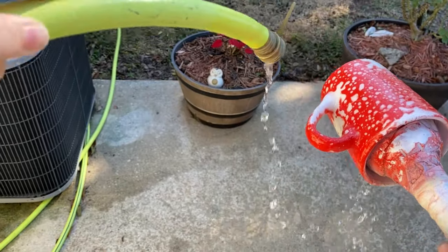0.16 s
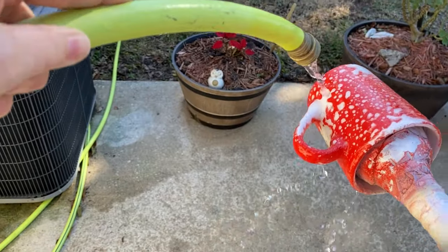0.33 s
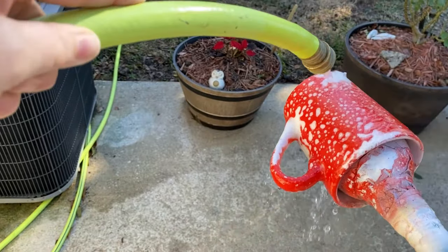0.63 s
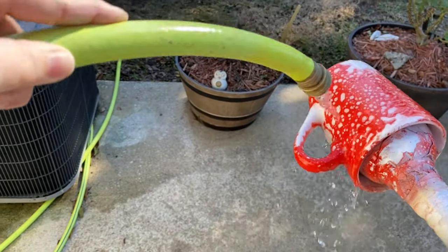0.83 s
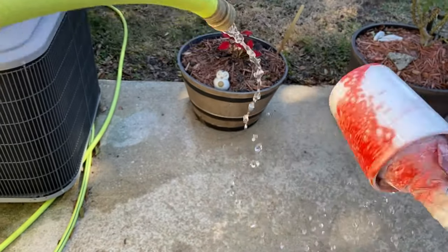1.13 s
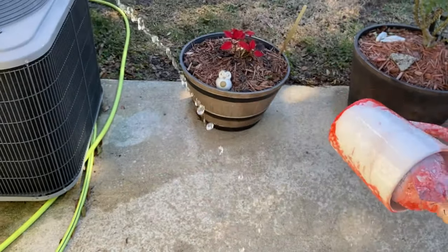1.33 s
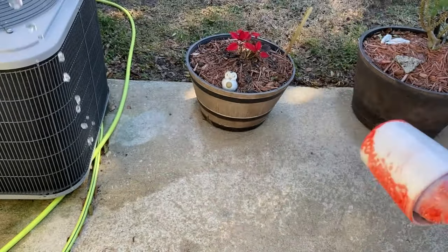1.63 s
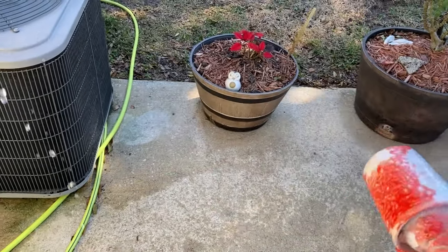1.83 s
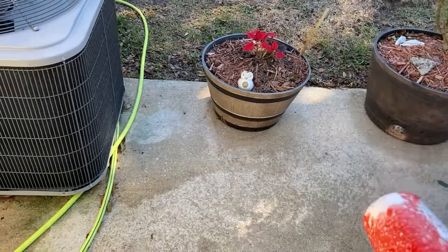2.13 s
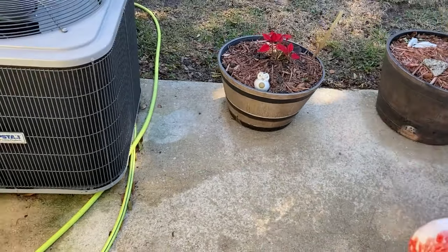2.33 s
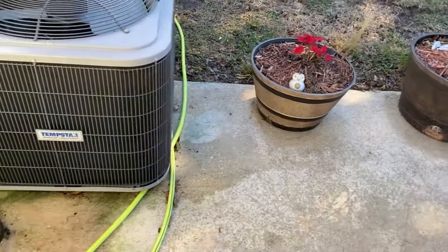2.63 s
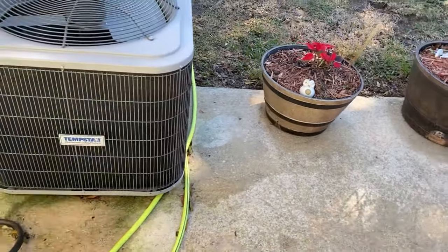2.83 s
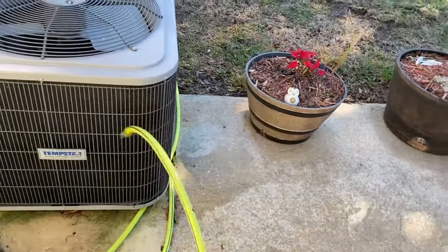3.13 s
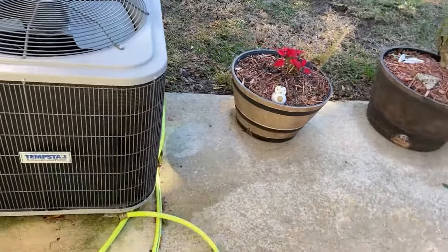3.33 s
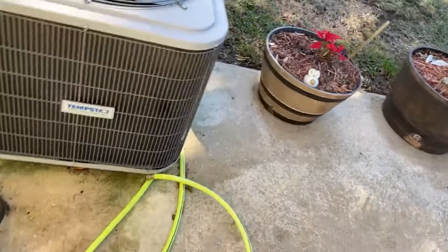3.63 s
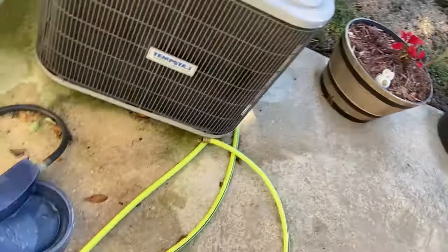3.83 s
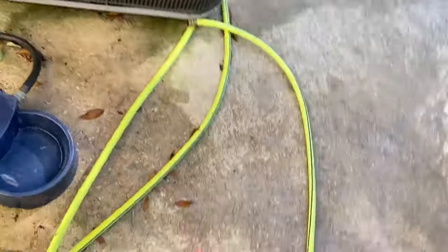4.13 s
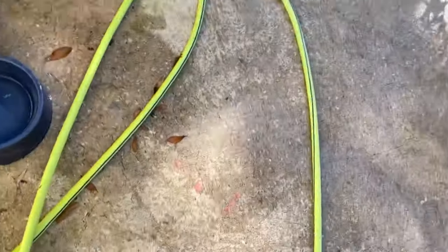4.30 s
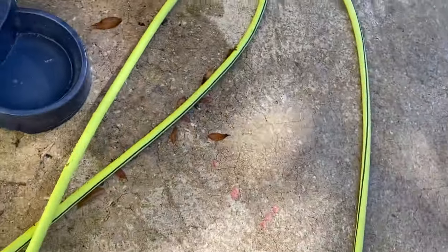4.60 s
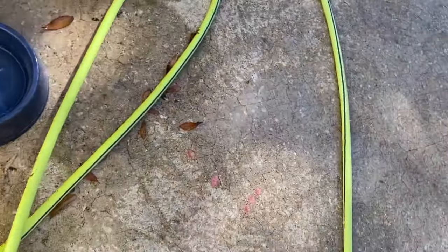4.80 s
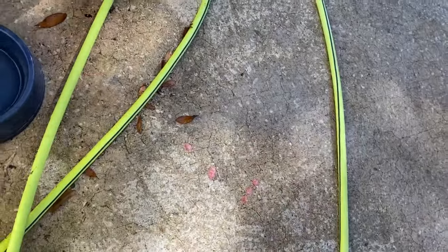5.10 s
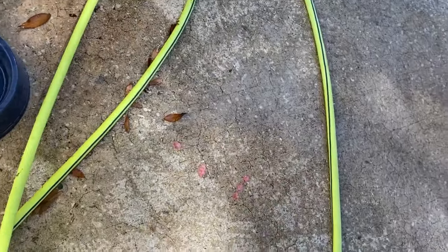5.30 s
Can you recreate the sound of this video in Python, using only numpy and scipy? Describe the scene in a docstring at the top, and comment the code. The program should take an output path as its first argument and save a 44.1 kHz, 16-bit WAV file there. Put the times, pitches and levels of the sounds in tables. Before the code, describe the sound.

Handheld stereo camera on a patio with short slap echoes and distant traffic rumble. A garden hose trickles in irregular splats and tiny gurgles, slowing to stray drips. Then rapid metallic bangs, a brassy rattle and a rough scrape; the hollow metal roar dies slowly. Near the end, a knock, a brief bird chip and thuds from a hand on the camera.

```python
"""Hose let go beside a metal housing

Water trickling from a garden hose splats on wet concrete: noise bursts, then sliding bubble notes, over
fine ticking grains. The hose is let go: its brass end bangs on a sheet-metal housing, whose shaped noise
roars and dies away slowly, and the hose scrapes over the slab in clumped grains. Noise bands make distant
traffic, a hollow drone and hiss; wandering tones make faint notes; damped sines make gurgles, knocks and
a hand's bumps on the camera; one bird chip is a two-partial tone pulse."""
import sys
import numpy as np
from scipy import signal
from scipy.fft import rfft, irfft, next_fast_len
from scipy.io import wavfile
from scipy.ndimage import uniform_filter1d, map_coordinates

SR = 44100
rng = np.random.default_rng(int(sys.argv[2]) if len(sys.argv) > 2 else 0)


def generate_wav(signal):
    """Clip the signal to [-1, 1] and save it as 16-bit WAV at the path in sys.argv[1]."""
    frames = np.transpose(np.atleast_2d(signal))
    scaled = np.clip(frames, -1, 1) * 32767
    pcm = np.round(scaled).astype(np.int16)
    wavfile.write(sys.argv[1], SR, pcm)


N = 240609

# level of the fine droplets, before each user's offset: t/s, level/dB
SPRAY_LEVEL = [(0.0, -46), (0.48, -53), (0.7, -60), (0.79, -58), (0.85, -44), (1.0, -55), (1.18, -53.5),
               (1.3, -43.5), (1.5, -53), (1.77, -57.5), (2.2, -55), (2.37, -57), (2.9, -88)]
# relative spectrum of struck sheet metal and of the taps: f/Hz, density/dB per Hz
CLATTER_SPECTRUM = [(130, -39), (220, -23), (450, 3.5), (900, -7), (1400, -0.5), (2300, -0.5), (3500, -15),
                    (5000, -13), (7500, -14), (11000, -19.5), (16500, -18)]
LAG_S = 0.000178  # extra travel time to the right port


def amp(db):
    """Level to amplitude: 20 dB is a factor of ten."""
    return 10 ** (np.asarray(db) / 20)


def unit(x):
    """Normalisation to unit root-mean-square amplitude."""
    return x / np.sqrt(np.mean(x ** 2) + 1e-20)


def along(points, hz):
    """Linear interpolation of (f/Hz, value) points on a logarithmic frequency axis."""
    f, v = np.transpose(points)
    return np.interp(np.log(hz + 1), np.log(f + 1), v)


def curves(rows):
    """Linear interpolation in time: one value per sample for each column after t/s."""
    s, *cols = np.transpose(rows)
    return [np.interp(np.arange(N) / SR, s, c) for c in cols]


def add(track, s, sound, pan_db=0):
    """Superposition at s seconds, with a level difference between ports (positive favours the left)."""
    part = track[:, round(s * SR):round(s * SR) + sound.shape[-1]]
    part += (sound * amp([[pan_db / 2], [-pan_db / 2]]))[:, :part.shape[1]]


def later(x):
    """Interaural-style delay: a sound from the left reaches the right port a moment later."""
    return np.array([x, np.pad(x, (round(LAG_S * SR), 0))[:len(x)]])


def rush(n, gain, patchy_db=0., size=512, near=None):
    """Filtered noise with partial coherence between ports: gain(hz, t) shapes it, random patches roughen it.

    near is the share of the right port that repeats the left one, delayed."""
    # correlation between the ports: f/Hz, correlation coefficient
    likeness = [(60, 0.91), (150, 0.94), (380, 0.41), (950, -0.085), (1500, -0.27), (2380, 0.17),
                (4000, 0.28), (15000, -0.29)]
    # left-right balance: f/Hz, level difference/dB
    balance = [(60, 0.5), (200, 0), (380, 1.5), (700, 3), (1290, 1), (2380, 0.5), (5980, 1.5), (15000, -1)]
    hz, t, z = signal.stft(rng.standard_normal((2, n)), SR, nperseg=size)
    field = uniform_filter1d(rng.standard_normal(z.shape[1:]), size=5, axis=0)
    field = uniform_filter1d(field, size=8, axis=1)
    # two independent noises, mixed as sum and difference, give the wanted correlation
    turn = np.arccos(np.clip(along(likeness, hz), -1, 1))[:, None] / 2
    mid, side = z[0] * np.cos(turn), z[1] * np.sin(turn)
    left, right = mid + side, mid - side
    if near is not None:
        near = np.clip(near, 0, 1)
        delay = np.exp(-2j * np.pi * hz * LAG_S)[:, None]
        right = near * left * delay + np.sqrt(1 - near ** 2) * right
    lean = amp(along(balance, hz) / 2)[:, None]
    pair = np.array([left * lean, right / lean])
    shaped = pair * gain(hz[:, None], t) * amp(patchy_db * unit(field))
    return signal.istft(shaped, SR, nperseg=size)[1][:, :n]


def ring(hz, t60, attack):
    """Damped oscillation: a sine with exponential onset and decay, t60 long."""
    t = np.arange(round(t60 * SR)) / SR
    return np.sin(2 * np.pi * hz * t) * amp(-60 * t / t60) * (1 - np.exp(-t / attack))


def patio(x):
    """Convolution with early reflections: near walls send a slap after 6 ms among scattered echoes.

    The echoes differ at each port and at each call."""
    t = np.arange(round(.12 * SR)) / SR
    lumps = amp(3.5 * unit(uniform_filter1d(rng.standard_normal(len(t)), size=60)))
    present = rng.random(len(t)) < .02 + 2 * t  # echo density grows with time
    echoes = rng.standard_normal((2, len(t))) * present
    tail = echoes * lumps * amp(-60 * t / 0.09) * (1 - np.exp(-(t / 0.003) ** 2))
    tail *= amp(-8) / np.linalg.norm(tail, axis=1, keepdims=True)
    tail[:, round(.0062 * SR)] += amp(-17)
    tail[:, 0] = 1  # direct sound
    return signal.fftconvolve(x, tail, axes=1)[:, :N]


def yard():
    """Stationary noise bands under slow level curves: traffic rumble, a hollow drone and outdoor hiss."""
    # background levels: t/s, traffic level/dB, drone level/dB, hiss level/dB (before its offset)
    levels = [(0.0, -48.5, -62, -57), (1.26, -48.5, -59, -58), (1.81, -44, -53.5, -57),
              (3.02, -50, -54, -57), (3.22, -61, -56, -49.5), (3.72, -48, -75, -53),
              (4.36, -47.5, -50.5, -51), (4.82, -48, -46.5, -50), (5.46, -42.5, -51, -50)]
    # relative spectra, all three: f/Hz, density/dB per Hz
    traffic_spectrum = [(15, -56), (30, -45), (48, -26), (65, 1), (85, -5), (130, -14), (215, -11.5),
                        (320, -21), (600, -31.5), (1200, -56)]
    drone_spectrum = [(200, -26), (330, 2.5), (420, 0.5), (520, -5), (650, -1.5), (780, -7), (1100, -11),
                      (1600, -41)]
    hiss_spectrum = [(300, -18), (800, 4.5), (1400, -1.5), (2500, -0.5), (3500, -3), (4700, -3),
                     (7000, -6.5), (11000, -13), (16500, -16)]

    def steady(points, patchy_db):
        return unit(rush(N, lambda hz, t: amp(along(points, hz)), patchy_db, size=2048))

    traffic_db, drone_db, hiss_db = curves(levels)
    traffic = amp(traffic_db) * steady(traffic_spectrum, 1.97)
    hollow = amp(drone_db) * steady(drone_spectrum, 4.1)
    hiss = amp(hiss_db + 3.5) * steady(hiss_spectrum, 1.0)
    return traffic + hollow + hiss


def spray():
    """Granular superposition: fine droplets tick for a cycle or two each, a few much louder than the rest."""
    level_db, = curves(SPRAY_LEVEL)
    draw = rng.random((10000, 4))
    at = (draw[:, 0] * SPRAY_LEVEL[-1][0] * SR).astype(int)
    hz = 5500 * 2 ** (1.6 * draw[:, 1:2])
    k = np.arange(64)
    cycles = hz * k / SR
    loudness_db = np.minimum(-4 * np.log(draw[:, 2:3]), 19)
    grain = np.sin(2 * np.pi * cycles) * (1 - np.exp(-cycles / 0.29)) * np.exp(-cycles / 0.23)
    grain *= amp(loudness_db)
    where = (at[:, None] + k).ravel()
    lean_db = 13 * (draw[:, 3:] - 3.5)  # always negative: almost wholly at the right port
    out = np.array([np.bincount(where, (grain * amp(side * lean_db)).ravel(), N) for side in (1, -1)])
    return patio(amp(level_db - 14.0) * unit(out))


def drops():
    """Impact and cavity resonance: a sharp splat that darkens at once, then a closing bubble's sliding note."""
    # clearly heard drops, before the echoes:
    # t/s, bubble level/dB, bubble f/Hz, bubble swell/ms, relative splat level/dB
    clear_drops = [(0.0332, -31, 5970, 0.8, -44), (0.0854, -21, 2260, 0.55, -32.5),
                   (0.0854, -20, 3910, 1.37, -36), (0.101, -36, 4900, 0.51, -49),
                   (0.133, -36, 4630, 0.77, -37), (0.1596, -22.5, 3300, 0.49, -29.5),
                   (.179, -34, 6500, .5, -39), (0.1987, -26, 5230, 0.31, -34),
                   (0.2663, -22.5, 3800, 0.83, -37), (0.2807, -33, 6900, 0.46, -32.5),
                   (0.3034, -16.5, 4300, 0.22, -37), (0.312, -35, 5500, .5, -43),
                   (0.355, -31.5, 4760, 0.33, -48), (0.366, -38, 5040, 0.59, -39),
                   (.421, -27.5, 6520, 0.34, -36), (0.4494, -33, 4750, 0.24, -34),
                   (0.47, -22.5, 5760, 0.23, -41), (0.4815, -16.5, 3720, 0.42, -27),
                   (0.485, -24.5, 3580, 0.82, -41), (0.515, -37, 6840, .5, -36),
                   (0.5355, -12.5, 5400, 0.11, -33.5), (.617, -38, 6440, 0.41, -38),
                   (0.6427, -35.5, 5930, 0.58, -45), (0.8256, -22, 4400, 0.18, -34.5),
                   (0.8529, -18, 4820, 0.21, -32), (.861, -35, 5900, 0.42, -42),
                   (0.8775, -34, 5040, 0.65, -44), (0.9316, -30, 5030, 0.43, -41),
                   (.942, -27.5, 5700, 0.37, -46), (0.9762, -25, 2200, 0.6, -42),
                   (.977, -16, 4140, 1.2, -46), (1.034, -34, 5100, 0.3, -42),
                   (1.0984, -22, 4820, 0.34, -39), (1.26, -30, 3100, 0.47, -32.5),
                   (1.283, -31, 4900, 0.39, -47), (1.2958, -32, 7160, 0.38, -39),
                   (1.313, -27, 5100, 0.36, -45), (1.3174, -28, 2700, 0.38, -39),
                   (1.3395, -36, 6500, 0.4, -39), (1.3571, -35, 5370, 0.5, -34),
                   (1.372, -38, 6000, 0.35, -38), (1.428, -18, 2820, 0.81, -29.5),
                   (1.45, -37, 7500, 0.63, -38), (1.469, -33, 5360, 0.48, -40),
                   (1.496, -36, 5600, 0.29, -45), (1.5024, -22.5, 2590, 0.74, -34),
                   (1.515, -29, 7040, 0.5, -41), (1.6069, -34, 6450, 0.38, -42),
                   (1.9, -32, 6400, 0.37, -49), (1.9094, -28, 5000, 0.37, -42),
                   (2.1535, -37, 4550, .55, -37), (2.317, -19, 3310, 0.84, -25.5),
                   (2.3204, -19.5, 4680, 0.8, -36), (2.41, -37, 5200, 0.47, -32),
                   (2.493, -27.5, 6460, 0.39, -35.5)]
    bubble_after_s = 0.000546  # the note follows the splat
    # slide in octaves per ms of swell; quicker swells than the steady one sag in pitch, slower ones climb
    slide_octaves, steady_swell_ms = 1, 0.41
    out, t = np.zeros((2, N)), np.arange(round(.012 * SR)) / SR
    # many small drops follow the spray level
    draw = rng.standard_normal((260, 2))
    at = rng.random(len(draw)) * SPRAY_LEVEL[-1][0]
    size_db = np.interp(at, *np.transpose(SPRAY_LEVEL)) + 0.5 + 3.2 * np.minimum(draw[:, 0], 1.5)
    small_hz = 6920 * 2 ** (0.303 * draw[:, 1])
    small = [(s, db, hz, 0.4, db + 4) for s, db, hz in zip(at, size_db, small_hz)]
    for s, db, hz, swell_ms, splat_db in clear_drops + small:
        u = np.maximum(t - bubble_after_s, 0) * 1000 / max(swell_ms, .2)  # time in swells
        pitch = hz * 2 ** (slide_octaves * (swell_ms - steady_swell_ms) * np.tanh(u - 1))
        bubble = np.sin(2 * np.pi * np.cumsum(pitch) / SR) * u ** 0.74 * np.exp((1 - u ** 2.25) / 1.85)
        hiss = np.diff(rng.standard_normal(len(t) + 1)) * amp(1 - 60 * t / 0.0076)
        falling_hz = hz * (1.6 + 1.317 * np.exp(-t / 0.00048))
        phase = 2 * np.pi * np.cumsum(falling_hz) / SR + 2 * np.pi * rng.random()
        sweep = np.sin(phase) * amp(3.0 - 60 * t / 0.011)
        splat = (hiss + sweep) * (1 - np.exp(-t / 0.00016))
        drop = amp(db) * bubble + amp(splat_db) * splat
        add(out, s, patio(drop[None]), 1.3 + rng.normal(0, 2.5))
    return out


def gurgles():
    """Bubble resonance: each gurgle of water is one damped oscillation."""
    # gurgles, level before onset and decay: t/s, level/dB, f/Hz
    gurgle_notes = [(0.536, -35.5, 1596), (0.678, -43.5, 1376), (.742, -43, 1535), (.812, -44, 1490),
                    (.912, -47, 1480)]
    out = np.zeros((2, N))
    for s, db, hz in gurgle_notes:
        add(out, s, amp(db) * ring(hz, 0.066, 0.0028))
    return out


def hums():
    """Narrow-band modulation: faint hollow notes glide while strength and phase wander like narrow noise."""
    # hollow notes, level before the wander: t/s, length/s, level/dB, first f/Hz, last f/Hz, width/Hz
    notes = [(0.65, .12, -58, 1460, 1507, 198), (.83, 0.15, -61, 1520, 1540, 169),
             (1.052, .2, -60, 1450, 1590, 150), (1.727, 0.65, -61, 2080, 1614, 380),
             (1.86, 0.21, -54.5, 670, 633, 131), (2.25, 0.44, -51.5, 635, 661, 129.2),
             (2.382, 0.28, -54, 470, 390, 132)]
    out = np.zeros((2, N))
    for s, length, db, first_hz, last_hz, width_hz in notes:
        n = round(length * SR)
        knots = rng.standard_normal((2, 300))
        a, b = (map_coordinates(k, [np.arange(n) * width_hz / SR + 2]) for k in knots)
        phase = 2 * np.pi * np.cumsum(np.linspace(first_hz, last_hz, n)) / SR
        wandering = a * np.sin(phase) + b * np.cos(phase)
        add(out, s, amp(db) * np.sqrt(np.hanning(n)) * wandering, 3)
    return out


def knocks():
    """Impulse response of single modes: dull knocks and bumps are damped oscillations."""
    # knocks and bumps, level before offset and onset: t/s, level/dB, f/Hz, t60/s, left-right difference/dB
    blows_heard = [(1.505, -45, 656, 0.12, 4), (1.84, -39.5, 648, 0.11, 2), (2.15, -48.5, 448, 0.17, 3),
                   (2.2, -51.5, 1000, 0.033, 25), (2.43, -27.5, 47.2, 0.091, 5),
                   (2.945, -42.5, 641, 0.13, 4), (3.1095, -10.5, 816, 0.02, 11),
                   (3.1644, -14, 1305, 0.021, 4), (3.167, -15, 1370, .02, 2), (3.174, -17, 974, 0.025, 7),
                   (3.1799, -11, 1260, 0.022, 4), (4.1, -30, 148, 0.15, 7), (4.2487, -33.5, 4300, 0.008, 5),
                   (4.2482, -30, 1923, 0.011, 15), (4.2491, -18.5, 671, 0.014, 15),
                   (4.2495, -22, 326, 0.02, 3), (5.372, -19, 330, 0.0072, 4), (5.406, -21.5, 108, 0.053, 2),
                   (5.426, -9.5, 117, 0.025, 2.5), (5.417, -24.5, 275, 0.064, 4),
                   (5.4331, -19.5, 70.4, 0.11, 3)]
    out = np.zeros((2, N))
    for s, db, hz, t60, pan_db in blows_heard:
        add(out, s, -amp(db + 2) * ring(hz, t60, 0.24 / hz), pan_db)
    return out


def taps():
    """Broadband transients: short rustles and taps are noise under a rapid exponential decay."""
    # rustles and taps, level before onset and decay: t/s, level/dB, t60/s, left-right difference/dB
    tap_events = [(2.15, -41, .22, 4), (2.195, -41, .13, 6), (4.2485, -27, .014, 5)]
    out, t = np.zeros((2, N)), np.arange(SR // 5) / SR
    for s, db, t60, pan_db in tap_events:
        noise = unit(rush(len(t), lambda hz, _: amp(along(CLATTER_SPECTRUM, hz)), size=256))
        add(out, s, noise * amp(db - 60 * t / t60) * (1 - np.exp(-20 * t / t60)), pan_db)
    return out


def housing():
    """Modal excitation: a blow cracks, clatters, rings the brass and makes panel modes roar, bass longest."""
    # blows of the hose end, relative levels: t/s, clatter level/dB, roar level/dB, brass level/dB,
    # rise/ms, clatter t60/s, edge band gain/dB, body band gain/dB, best-struck brass f/Hz
    blows = [(3.012, -28.5, -44.5, -68, 3.9, 0.079, -13, 13, 1163),
             (3.0299, -13.5, -23, -43, 5, 0.23, -6, 2, 2300),
             (3.065, -14.5, -33, -48, 5.4, 0.3, 3, 15.5, 2300),
             (3.108, -26, -37.5, -49, 4.8, 0.29, 2, 23, 2300),
             (3.162, -12.5, -33.5, -32.5, 1.2, 0.11, -4, 1, 5180),
             (3.2163, -12.5, -37.5, -21.5, 0.5, 0.088, 1, -4, 4565),
             (3.5479, -24, -37.5, -32, 1, 0.05, 16, 14, 2750), (3.646, -36, -55, -47, 3, 0.12, 2, -3, 5180)]
    # relative spectrum of the roar: f/Hz, density/dB per Hz
    roar_spectrum = [(50, -45), (95, -9.5), (140, -23.5), (220, -10), (450, -8), (800, -2.5), (1150, -6),
                     (1500, -5.5), (2300, -9.5), (3300, -18.5), (4700, -17), (6200, -37), (8000, -55),
                     (12000, -25), (16500, -42)]
    # decay of the roar: f/Hz, t60/s
    fade = [(80, 12.6), (250, 2.99), (700, 2.96), (1300, 1.8), (2500, 0.99), (5000, 1.1), (12000, 0.68)]
    # panel resonances, on the scale of the roar spectrum: f/Hz, width/Hz, level/dB (before a common factor)
    panel = [(233.2, 24.8, 10.5), (424, 90, -7.5), (557, 20, -6), (732, 26, -2.5), (915.4, 24.6, 6.5),
             (1144, 28, 1), (2380, 40, -2.5), (2770, 100, -7), (4500, 33, -17)]
    # modes of the brass end: f/Hz (before a small scatter), relative level/dB, t60/s
    brass = [(1155, 6.5, 0.092), (1440, 11.5, 0.083), (2320, -6, 0.15), (2820, -10, 0.07), (4630, -7, 0.1),
             (5140, -8, 0.1)]
    rattle_hz, rattle_depth = 260, .9  # speed and depth of the brass chattering as it rings
    crack_last_hz, crack_fall_s = 4800, .0015
    out, t = np.zeros((2, N)), np.arange(round(2.6 * SR)) / SR
    short = t[:SR // 2]

    def hump(hz, centre_hz, octaves):
        return np.exp(-(np.log2((hz + 1) / centre_hz) / octaves) ** 2)

    def peaks(hz):
        resonances = sum(amp(db - along(roar_spectrum, c)) / (1 + (2 * (hz - c) / w) ** 2) for c, w, db in panel)
        return 1 + 0.71 * resonances

    def roar_gain(hz, t):
        return peaks(hz) * amp(along(roar_spectrum, hz) - 60 * t / along(fade, hz))

    for s, clatter_db, roar_db, ring_db, rise_ms, t60, edge_db, body_db, best_hz in blows:
        def colour(hz, _):
            edge = edge_db * hump(hz, 1800, 0.76)
            body = body_db * hump(hz, 450, 0.41)
            return amp(along(CLATTER_SPECTRUM, hz) + edge + body)

        clatter = unit(rush(len(short), colour, 3, size=256, near=0.32))
        add(out, s, amp(clatter_db - 60 * short / t60) * clatter * (1 - np.exp(-short * 1000 / rise_ms)))

        # high notes first; the quicker the rise, the stronger the crack
        u = t[:SR // 50] / crack_fall_s
        crack_hz = crack_last_hz * (1 + 2.2 * np.exp(-u))
        crack = np.sin(2 * np.pi * np.cumsum(crack_hz) / SR) * u * np.exp(-u)
        add(out, s - crack_fall_s, amp(clatter_db - 7) / rise_ms * later(crack))

        roar = rush(len(t), roar_gain, 2.2, size=1024, near=0.29)
        add(out, s, amp(roar_db + 20.5) * roar * (1 - np.exp(-t / 0.0048)))

        for hz, level_db, brass_t60 in brass:
            note = ring(hz * (1 + 0.0062 * rng.standard_normal()), brass_t60, 0.0013)
            steps = np.arange(len(note)) * rattle_hz / SR
            chatter = 1 + rattle_depth * map_coordinates(rng.standard_normal(200), [steps])
            favoured_db = 11 * hump(hz, best_hz, 0.087)
            note_db = ring_db + level_db + favoured_db + rng.normal(0, 3.5)
            add(out, s, amp(note_db) * later(note * chatter))
    return out


def drag():
    """Stick-slip friction: grit catches and lets go under the sliding hose, in clumped ringing grains."""
    # scrape of the hose over the slab, level before clumping: t/s, level/dB
    scrape_level = [(3.03, -62), (3.06, -32), (3.25, -23), (3.31, -37), (3.38, -40), (3.45, -55),
                    (3.56, -29.5), (3.63, -54), (3.7, -47), (3.82, -77), (4.0, -70)]
    # bands where the scrape rings: f/Hz, spread/octaves
    grit_bands = [(2100, 0.36), (4700, 0.2)]
    # relative level of each band: level/dB
    grit_db = [3.5, -4.5]
    level_db, = curves(scrape_level)
    draw, spread = rng.random((2500, 4)), rng.standard_normal((2500, 1))
    start_s, end_s = scrape_level[0][0], scrape_level[-1][0]
    at = ((start_s + draw[:, 0] * (end_s - start_s)) * SR).astype(int)
    band = (draw[:, 1] * len(grit_bands)).astype(int)
    centre, octaves = np.array(grit_bands)[band].T[..., None]
    hz, k = centre * 2 ** (octaves * spread), np.arange(400)
    cycles = hz * k / SR
    loudness_db = np.array(grit_db)[band, None] + 16.5 * draw[:, 2:3] ** 3
    grain = np.sin(2 * np.pi * cycles) * np.exp(-cycles / 5.7) * amp(loudness_db)
    lean_db = 12.4 * (draw[:, 3:] - 1.1)  # always negative: weaker at the left, later at the right
    ports = []
    for side, lag in ((1, 0), (-0.64, round(LAG_S * SR))):
        where = (at[:, None] + k + lag).ravel()
        ports.append(np.bincount(where, (grain * amp(side * lean_db)).ravel(), N))
    out = np.array(ports)
    clumps = amp(4.4 * map_coordinates(rng.standard_normal(400), [np.arange(N) * 45 / SR]))
    return amp(level_db) * clumps * out / np.std(out[:, at.min():at.max()])


def bird():
    """Two-partial tone pulse: a chip with a Gaussian rise and a slower fall."""
    # the chip: t/s, fundamental level/dB, f/Hz, relative octave partial level/dB, rise constant/s
    chip = (4.829, -33.5, 3330, -9, .007)
    out = np.zeros((2, N))
    s, db, hz, overtone_db, half = chip
    t = np.arange(-.03 * SR, 0.06 * SR) / SR
    note = np.sin(2 * np.pi * hz * t) + amp(overtone_db) * np.sin(4 * np.pi * hz * t)
    swell = np.exp(-(t / half) ** 2 / (1 + 3 * np.maximum(t, 0) / half))
    add(out, s - .03, amp(db) * note * swell)
    return out


def scene():
    """Linear superposition of all sources at the two microphone ports."""
    water = spray() + drops() + gurgles()
    hose = housing() + drag()
    return yard() + water + hums() + knocks() + taps() + hose + bird()


def record(dry):
    """Band limitation: the camera keeps nothing from 16 kHz up."""
    m = next_fast_len(N)
    kept = np.fft.rfftfreq(m, 1 / SR) < 16000
    return irfft(rfft(dry, m) * kept, m)[:, :N]


dry = scene()
out = record(dry)
generate_wav(out)
```